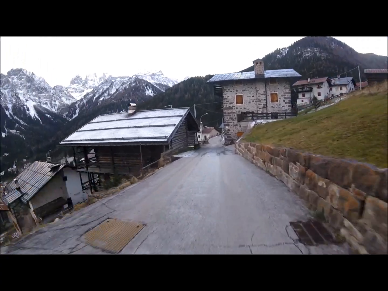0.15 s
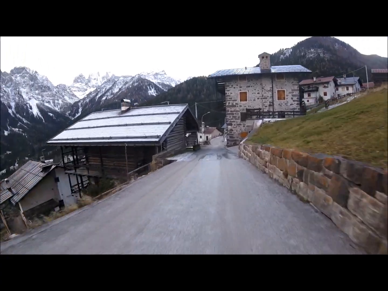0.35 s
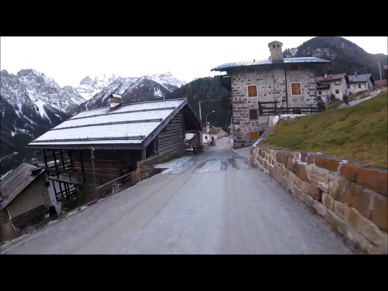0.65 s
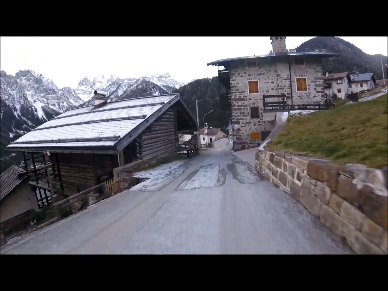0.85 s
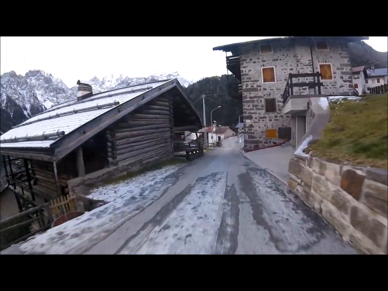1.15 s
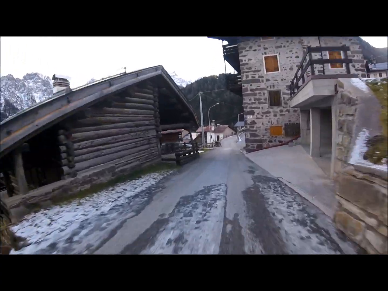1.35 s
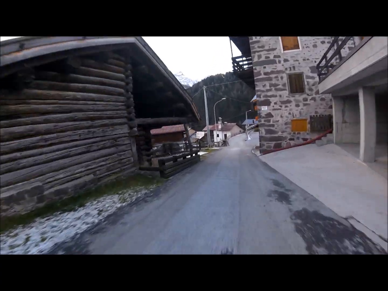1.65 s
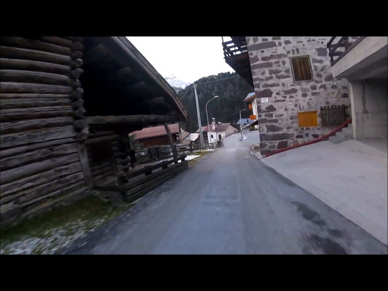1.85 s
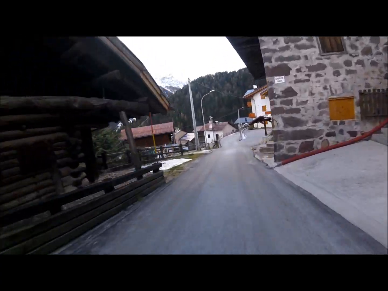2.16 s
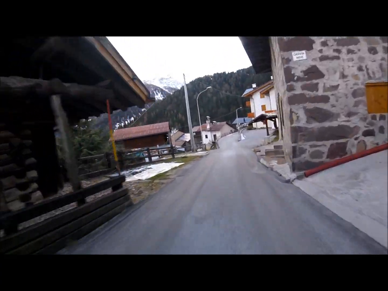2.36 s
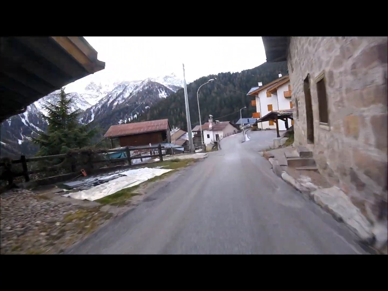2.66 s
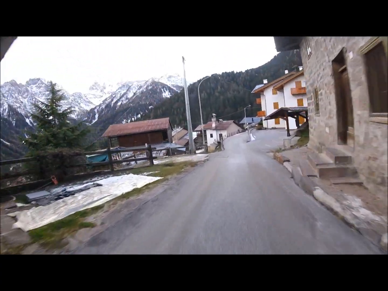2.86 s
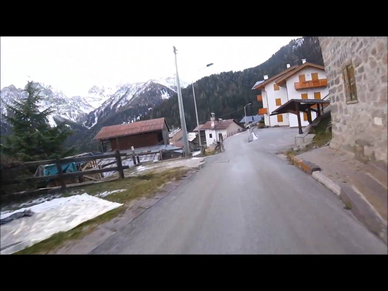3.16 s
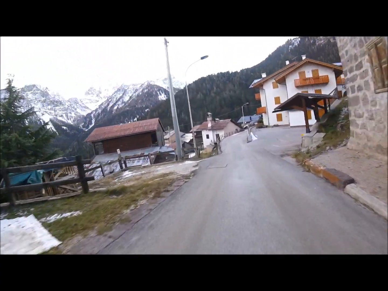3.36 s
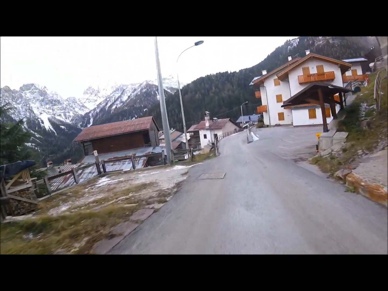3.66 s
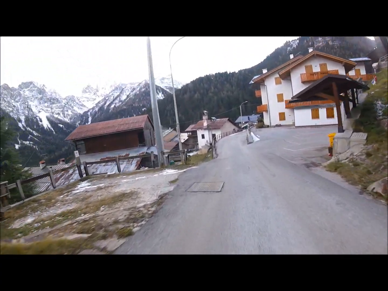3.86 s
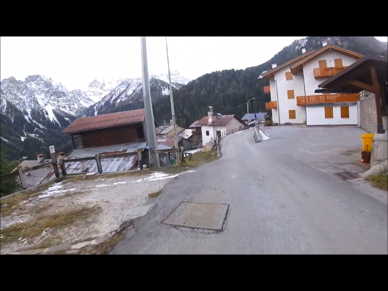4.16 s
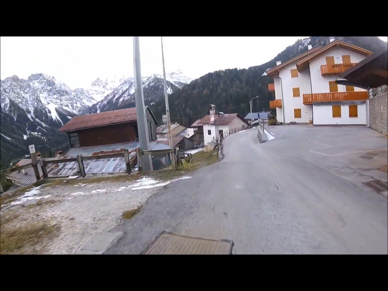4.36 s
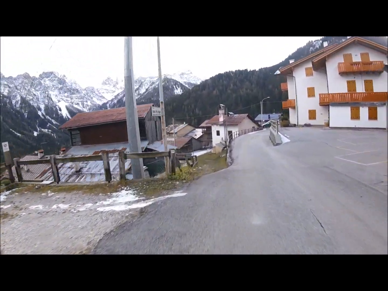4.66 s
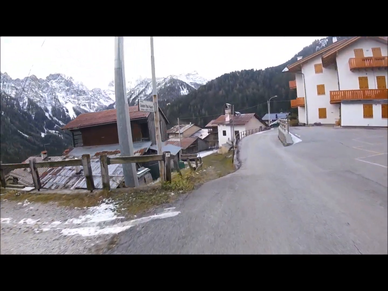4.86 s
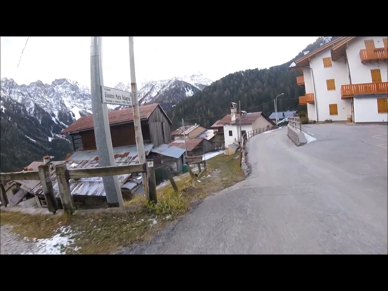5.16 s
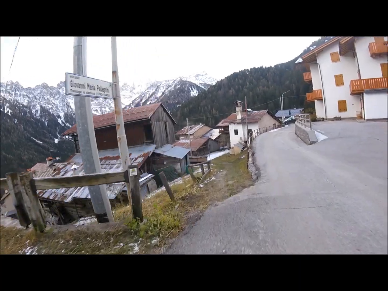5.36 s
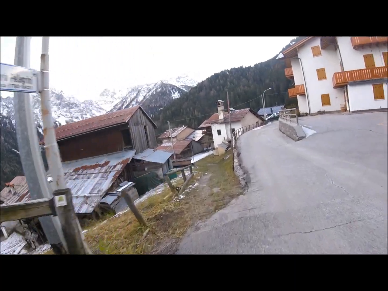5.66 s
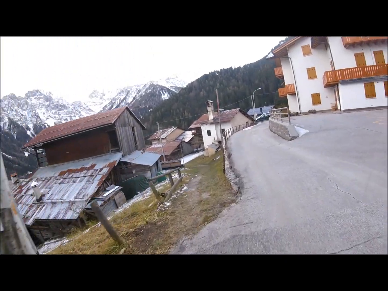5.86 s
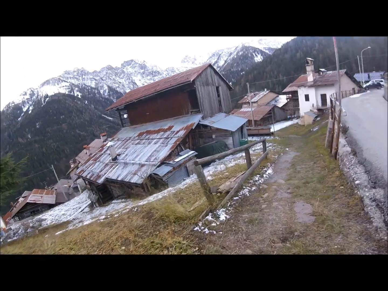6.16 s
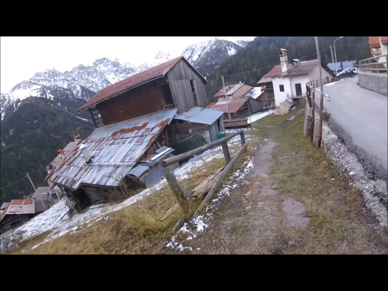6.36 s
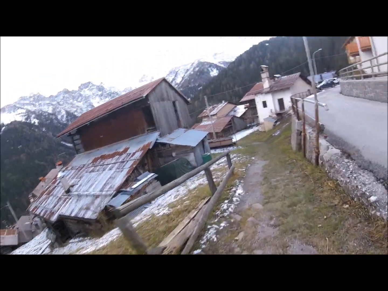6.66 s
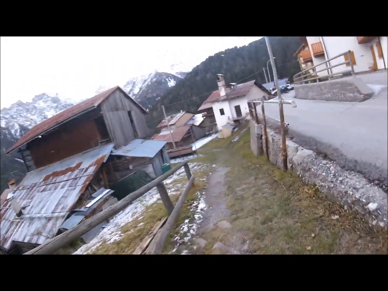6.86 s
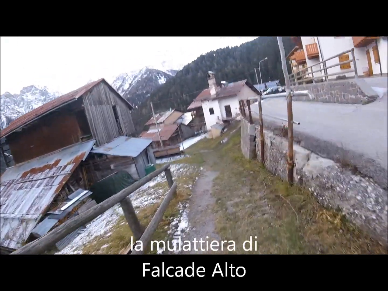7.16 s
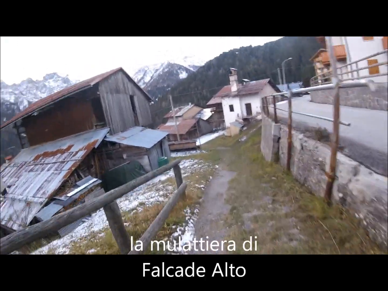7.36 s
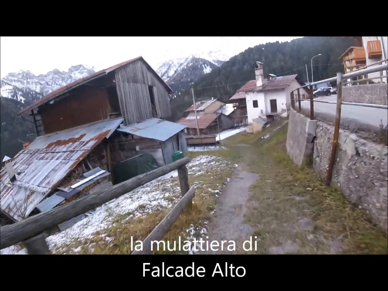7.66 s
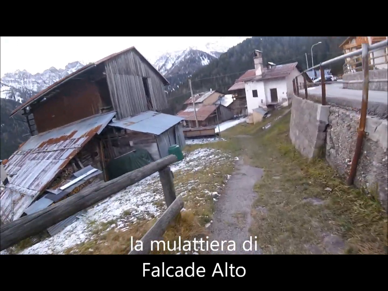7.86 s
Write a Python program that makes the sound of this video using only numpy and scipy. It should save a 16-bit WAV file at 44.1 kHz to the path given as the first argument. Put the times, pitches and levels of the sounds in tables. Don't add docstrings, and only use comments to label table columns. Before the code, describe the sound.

Outdoors, close on a moving bicycle: a buzzing tread drone with soft tyre hiss and frame rumble, wind pressing low on the microphone. Small dry ticks cluster early on and again midway. The drone sinks in pitch with slowing, thin brake squeaks and a faint disc whine appear, and rougher ground brings hollow thumps, quieter rolling and slight clicks at abrupt scene changes.

```python
import sys
import numpy as np
from scipy import signal
from scipy.fft import rfft, irfft
from scipy.io import wavfile
from scipy.ndimage import uniform_filter1d

SR = 44100
rng = np.random.default_rng(int(sys.argv[2]) if len(sys.argv) > 2 else 0)


def persist_wave(psi):
    counts = np.round(np.clip(psi, -1, 1) * 32767).astype(np.int16)
    wavfile.write(sys.argv[1], SR, np.atleast_2d(counts).T)


def how_loud(loudness_db):
    steps = np.asarray(loudness_db, float) / 20
    return 10 ** steps


N = 352800
T_S = np.arange(N) / SR

# t/s, block rate f/Hz, tyre load level/dB, side-block level/dB
WHEEL = [
    [(0.0, 288.4, 2.5, -9), (0.3, 285.3, -1, -12), (0.5, 297.2, 0, -5), (0.76, 280, -2.5, -10),
     (0.9, 287.8, -0.5, -7), (1.38, 282.3, -5, -2.5)],
    [(1.73, 289.4, -5, -28), (1.84, 290.8, 2, -1), (2.1, 281.5, -1.5, 2), (2.4, 271.4, -2.5, 3),
     (2.74, 250.9, -1, 0.5), (3.35, 220.3, 0.5, -2.5), (3.45, 217.5, 2, -13), (3.85, 197.3, 1, -12),
     (4.13, 177.5, -6, -5), (4.62, 156.8, 1, -12), (4.75, 148.7, -8.5, -2.5), (5.3, 108.4, -2, -5)],
]
TREAD_ORDERS = [0.72, 1, 1.44, 1.72, 2, 2.88, 3]
# level/dB (side row, centre row, side octave, sum tone, octave,
# fourth of side row, twelfth)
TREAD_LEVELS_DB = [-15, -16.5, -26.5, -22.5, -17.5, -30.5, -28.5]
# multiple of block rate [1], level/dB ahead of the frame modes
FAINT_ORDERS = [(0.89, -15.5), (1.2, -31.5), (2.44, -40.5)]
# f/Hz, half width/Hz, level/dB
HUM_MODES = [(153, 50, -8), (200.6, 15.4, -3), (227.5, 18, -12), (293, 12.8, -5), (320, 11.8, -1.5),
             (348.6, 11, 0), (363.8, 6.5, -6), (462, 19, -19), (548.3, 9.9, -4.5), (589, 6.6, -19),
             (710.8, 25, -1)]
# f/Hz, half width/Hz, level/dB
SIDEWALL_MODE = (416, 18, -8.5)
# f/Hz, width/Hz, level/dB
FRAME_MODES = [(196.5, 17, -7.5), (294.8, 37, -2.5), (334, 30, 2), (360.3, 21, -4), (447.5, 37, -17),
               (553, 86, -18), (698.4, 86, -8.5), (942, 69, -23)]
# t/s, rolling noise level/dB, ground roughness level/dB
RIDE = [(0.0, -38.5, -17.5), (0.7, -37.5, -23), (1.25, -38, -25.5), (1.6, -38, -22), (2.2, -38.5, -19.5),
        (3.1, -41, -22), (3.5, -40, -19), (4.0, -42, -17.5), (4.6, -44, -16.5), (5.0, -42.5, -18.5),
        (6.04, -45, -18), (6.12, -48, -23), (6.34, -45, -18), (6.44, -52.5, -25.5), (7.11, -47.5, -19.5),
        (7.42, -54.5, -26), (7.78, -51.5, -22), (8.0, -53, -28.5)]
# t/s, level/dB, half length/s
PATCHES = [
    (1.58, 0.5, 0.04),
    (3.18, 2, 0.062),
    (4.57, 5, 0.081),
    (5.17, 2.5, 0.083),
    (6.24, -0.5, 0.07),
    (6.84, 0.5, 0.087),
    (7.3, 7.5, 0.045),
    (7.55, -2.5, 0.082),
]
# f/Hz, level/dB per Hz
ROLL_SPECTRUM = [(240, -29), (400, 0.5), (534, -3.5), (712, -6.5), (834, -8.5), (959, -10.5), (1100, -16),
                 (1430, -15), (1870, -20.5), (2170, -24), (4300, -43), (5590, -68), (9460, -120)]
# f/Hz, level/dB per Hz
HISS_SPECTRUM = [(2350, -34), (4000, -20.5), (4220, -11.5), (5120, 3), (6050, -1.5), (6510, 4.5),
                 (7100, -5.5), (8120, -10.5), (8600, -14), (11200, -38), (18900, -120)]
# t/s, peak level/dB, f/Hz, t60/s
THUMPS = [(0.06, -8, 296, 0.071), (0.122, -8, 294, 0.11), (0.271, -6, 285, 0.11), (0.58, 0, 290.6, 0.25),
          (4.194, -7, 329, 0.15), (4.402, -12, 320.1, 0.12), (5.138, 3, 291.9, 0.25),
          (5.378, -5.5, 321.3, 0.21), (5.655, -5, 338, 0.097), (5.71, -3, 335, 0.24),
          (5.912, -6, 345.5, 0.14), (5.969, -22, 320, 0.16), (6.019, -13, 304, 0.34), (6.26, -9, 347, 0.29),
          (6.359, -4, 273, 0.13), (6.425, 7, 297, 0.1), (6.435, 2.5, 350, 0.15), (6.562, -9, 314, 0.13),
          (6.867, -8, 320, 0.13), (7.22, -2, 350, 0.17), (7.33, 4.5, 291, 0.077), (7.342, 2, 331, 0.12),
          (7.785, -36, 330, 0.089)]
# t/s, peak level/dB, f/Hz, length/s
TICKS = [(.5053, -31, 1410, 0.0018), (.7811, -35, 1100, 0.0023), (.9258, -36, 1100, 0.0018),
         (1.098, -41, 1510, 0.0018), (1.1677, -22.5, 1420, 0.0019), (1.3583, -32, 1530, 0.0018),
         (1.4077, -23, 1270, 0.0018), (1.4531, -26, 1300, 0.0018), (1.5174, -32, 1480, 0.0016),
         (1.537, -13.5, 1320, 0.0012), (1.5415, -18.5, 1500, 0.0028), (1.663, -23.5, 1473, 0.0025),
         (1.7994, -27, 1386, 0.0011), (2.0443, -38, 1330, .002), (2.6788, -28, 1450, .002),
         (2.8205, -36, 1410, 0.0019), (3.5054, -32, 1560, 0.0016), (3.8174, -26, 1490, 0.0025),
         (3.9188, -29, 2090, .0015), (3.9545, -25, 1460, 0.0031), (4.073, -31, 1517, 0.0022),
         (4.119, -27, 1514, 0.0027), (4.1934, -39, 1250, 0.0017), (4.2163, -26, 1270, 0.0015),
         (4.3284, -42, 1540, 0.0019), (4.3538, -35, 1900, .0015), (4.3754, -23, 1950, 0.0021),
         (4.393, -31, 1800, .003), (4.4177, -31, 1900, .0015), (4.4377, -30, 2000, .0015),
         (4.4433, -26, 1400, 0.003), (4.5205, -17.5, 1200, 0.0023), (4.5489, -37, 2000, .0015),
         (4.565, -20, 1295, 0.0022), (4.598, -23, 1430, 0.0014), (4.7586, -34, 1862, 0.0022),
         (5.1502, -21, 1270, 0.0023), (5.157, -31, 2300, 0.0034), (5.209, -26, 1700, 0.0018),
         (5.2584, -26, 1585, 0.0013), (5.2824, -31, 1560, 0.0017), (5.3226, -38, 1860, 0.0026),
         (5.4119, -33, 1840, 0.0022), (5.6045, -30, 1890, 0.002), (5.625, -30, 1700, .003),
         (5.6745, -35, 1200, 0.0019), (6.424, -28.5, 1760, 0.003), (6.9211, -36, 1250, .002),
         (6.977, -33, 1570, 0.0012), (7.071, -36, 1820, 0.002), (7.211, -32, 1520, 0.0048)]
# f/Hz, level/dB, t60/s
SHELL_MODES = [(760, 12, 0.025), (1400, 20, 0.026), (1560, 3.5, 0.013), (1840, 11.5, 0.03),
               (2300, -11, 0.044), (2780, -20, 0.029), (3500, -28.5, .012)]
# t/s, level/dB, f/Hz, width/Hz, length/s
SNAPS = [(1.537, -22.5, 1290, 150, .006), (5.8, -15.5, 350.4, 37, 0.14), (3.5, -17, 363, 13, 0.078),
         (.139, -29, 646, 300, .006), (3.363, -23, 693, 330, 0.0066), (3.908, -36, 716, 300, .005),
         (4.676, -31, 690, 430, .006), (4.72, -25.5, 692.6, 93, .25), (5.345, -30, 702.3, 280, 0.0056),
         (6.86, -31, 700, 460, .006), (7.044, -32, 700, 350, 0.0053), (7.581, -36, 700, 360, .006),
         (0.572, -37, 702, 400, .004), (1.45, -23.5, 436.6, 45, 0.17), (1.534, -12.5, 740, 960, 0.0038),
         (1.584, -19.5, 760, 780, 0.0032), (.82, -12.5, 203.5, 16, 0.076), (1.6, -16, 199.5, 25, 0.047),
         (2.256, -36, 690, 275, 0.004), (2.5, -32.5, 553, 8.8, 0.2), (2.28, -26, 553, 17, 0.074),
         (3.15, -27, 692, 30, 0.37), (3.1, -29.5, 553, 9, 0.1), (4.55, -21, 201, 14, .2),
         (4.84, -11.5, 192, 13, 0.039), (5.14, -20.5, 417.3, 37, .03), (5.145, -16, 710, 300, 0.015),
         (5.147, -28.5, 1880, 2200, 0.011), (5.1505, -32.5, 7000, 4100, 0.0035),
         (5.2, -18, 695, 270, 0.011), (5.4, -18, 186, 34, 0.099), (6.422, -24, 686, 600, 0.0049),
         (7.319, -40, 6570, 500, 0.0023), (7.326, -28.5, 1290, 930, 0.0046), (7.6, -50, 1800, 558, .012),
         (7.675, -38, 1019, 1100, 0.005), (7.745, -54, 8500, 2800, .003)]
# t/s, peak level/dB, length/s
JOLTS = [
    (6.11, -16, 0.025),
    (6.161, -32, 0.023),
    (6.186, -28, 0.021),
    (6.826, -7, 0.021),
    (7.253, -10, 0.037),
    (7.258, -26, 0.042),
    (7.588, -8.5, 0.025),
    (7.783, -10.5, 0.027),
]
# t/s of the top, peak level/dB, f/Hz, length/s
SQUEAKS = [(4.52, -64, 12250, 0.016), (4.885, -58, 12200, .014), (4.953, -35, 12370, .011),
           (5.008, -36, 12570, 0.0057), (5.09, -40, 12490, 0.016), (5.165, -71, 12400, .01),
           (5.245, -55, 12550, 0.016), (5.32, -53, 12500, 0.017), (5.48, -73, 12830, 0.013),
           (5.686, -55, 12500, 0.011), (6.057, -59, 12400, .006), (7.598, -37, 12370, 0.0066),
           (7.635, -66, 12600, .012), (7.682, -51, 12400, .012)]
# start t/s, length/s, level/dB, f/Hz
SQUEALS = [
    (5.555, .35, -52.5, 2468),
    (5.92, 0.19, -65, 2460),
    (6.94, 0.06, -58, 2456),
    (7.0, .07, -57, 2456),
    (7.095, .065, -54, 2456),
    (7.16, .13, -57, 2452),
    (7.07, .1, -62, 3085),
]
# f/Hz, level/dB per Hz
WIND_SPECTRUM = [(8.8, -33), (15, -1.5), (70, 6), (84, 7), (102, -12.5), (130, -19.5), (170, -46.5),
                 (290, -120)]
# t/s, level/dB, half length/s
GUSTS = [(0.0, 15, 0.0065), (.6, 2.5, 0.23), (.96, 6.5, 0.1), (1.2, 13, 0.045), (1.3, -2, 0.048),
         (1.45, 6.5, 0.095), (1.52, -13, 0.028), (2.2, -3.5, .04), (2.54, -6, 0.14), (2.75, 8, 0.046),
         (2.92, -8.5, 0.15), (3.09, 6.5, 0.046), (3.18, -14.5, 0.061), (3.5, -0.5, .12), (3.72, -4, 0.056),
         (4.12, 1.5, 0.13), (4.64, -3.5, 0.074), (5.15, 4.5, 0.16), (5.48, 3.5, 0.2), (5.88, -10, 0.024),
         (6.33, 5, 0.1), (6.64, -10.5, 0.091), (6.84, 3.5, 0.099), (7.08, -9, 0.071), (7.2, 6.5, 0.042),
         (7.3, -1, 0.033), (7.36, 10.5, 0.043), (7.5, -5.5, 0.13), (7.78, 0, 0.046)]
# t/s, dip level/dB, recovery/s, click level/dB, click top f/Hz
JOINS = [
    (6.0616, -22, .014, -22, 13500),
    (6.3679, -8, .05, -23, 7000),
    (7.2959, -8, .04, -19, 7000),
]


def tread():
    hz, load_db, side_db, _ = in_time(sum(WHEEL, []))
    gate = sum(in_time(rows)[-1] for rows in WHEEL)
    turn = 2 * np.pi * np.cumsum(hz) / SR
    hum = 0
    for k, db in zip(TREAD_ORDERS, TREAD_LEVELS_DB):
        modes = HUM_MODES + [SIDEWALL_MODE] * (k < 1.5)
        lit = sum(how_loud(top_db) / (1 + ((k * hz - f) / w) ** 2) for f, w, top_db in modes)
        level = how_loud(db + load_db + side_db * (k < 1) + 1.3 * drift(12))
        hum = hum + np.sqrt(2) * lit * level * np.sin(k * turn + .28 * k * drift(12))
    faint = 0
    for k, db in FAINT_ORDERS:
        faint = faint + how_loud(db + 2.2 * drift(8.6)) * np.sin(k * turn + 1.66 * drift(9.5))
    faint = gate * faint
    through_frame = 0
    for f, w, db in FRAME_MODES:
        through_frame = through_frame + how_loud(db / 2) * resonance(resonance(faint, f, 2 * w), f, w)
    return gate * hum + through_frame


def carcass_drone():
    tarmac_end_s, fall_db_per_s, path_db = (4.9, 6.7), 1.1, -13
    level_db = -24 - fall_db_per_s * np.minimum(T_S, tarmac_end_s[0])
    level_db = level_db + np.interp(T_S, tarmac_end_s, [0, path_db])
    return how_loud(level_db + 2.5 + 2.95 * drift(26)) * noise_band(98, 231, order=3)


def frame_rumble():
    grit = rng.standard_normal(N) * how_loud(1.0 * drift(8.1))
    rumble = 0
    for k, (hz, w, db) in enumerate(FRAME_MODES):
        ring = resonance(resonance(grit, hz, 3 * w), hz, w)
        rumble = rumble + (-1) ** k * how_loud(db) * ring / np.sqrt(w)
    return rms_one(rumble)


def rolling(roll_db):
    path_grit_db = 5 * (T_S > JOINS[1][0])
    scrub = how_loud(roll_db + 7.0) * coloured(ROLL_SPECTRUM, shared_db=1.0, own_db=1.67, rate_hz=52)
    stirred = resonance(resonance(rng.standard_normal(N), 1870, 200), 1870, 110)
    return scrub + how_loud(roll_db - 13 + path_grit_db) * rattle() + how_loud(roll_db - 15.0) * rms_one(stirred)


def rattle():
    clicks_per_s = 90
    clicks = (rng.random(N) < clicks_per_s / SR) * how_loud(1.1 * np.minimum(rng.exponential(1, N), 3)) + 1e-18
    ring = sum(how_loud(db) * resonance(clicks, hz, 300) for hz, db, t60 in SHELL_MODES)
    return rms_one(band(ring, 500, 4100, order=3))


def air_hiss(roll_db):
    hiss_db = -49 + 0.69 * (roll_db + 40)
    hiss = how_loud(hiss_db) * coloured(HISS_SPECTRUM, shared_db=0.46, own_db=1.24, rate_hz=51)
    dull_edge = how_loud(hiss_db - 8.5) * noise_band(2300, 3800, order=3)
    frost = (T_S > WHEEL[0][-1][0]) & (T_S < WHEEL[1][0][0])
    fall_db_per_s, frost_db, bright_db = 2.5, -6, 5.5
    top_db = -59 - fall_db_per_s * T_S + frost_db * frost + bright_db * bright_shot()
    return hiss + dull_edge + how_loud(top_db + 1.0 * drift(10)) * noise_band(8300, 9820, order=6)


def knocks():
    blows = struck(THUMPS, thump) + struck(TICKS, tick) + struck(SNAPS, snap) + struck(JOLTS, jolt)
    return signal.sosfilt(signal.butter(8, 9800, fs=SR, output="sos"), blows + 1e-18)


def thump(peak_db, hz, t60_s):
    t = np.arange(round(.2 * SR)) / SR
    body = np.sin(2 * np.pi * hz * t)
    body = body + 0.2 * np.sin(2 * np.pi * 1.3 * hz * t) + 0.26 * np.sin(2 * np.pi * 0.78 * hz * t)
    body = body + 0.04 * np.sin(2 * np.pi * 700 * t)
    decay = how_loud(-60 * t / np.clip(t60_s, .02, 1))
    onset = 1 - np.exp(-(t / 0.00092) ** 2)
    return how_loud(peak_db - 7.5) * body * decay * onset


def tick(peak_db, hz, length_s):
    crack, tail, size = 1.1, .07, 1600
    contact = np.exp(-((np.arange(size) / SR - .8 * length_s) * hz * 9) ** 2)
    clatter = contact + tail * burst(2 * length_s, size)
    ring = 0
    for f, db, t60_s in SHELL_MODES:
        ring = ring + how_loud(db - 8 * abs(np.log2(f / hz))) * resonance(clatter, f, 8.0 / t60_s)
    ring = band(ring + crack * resonance(clatter, 1.4 * hz, 1500), 500, 3300, order=4)
    return how_loud(peak_db + 2) * ring / abs(ring).max()


def snap(level_db, hz, width_hz, length_s):
    shake = burst(length_s / 2, size=round(4 * length_s * SR) + 1500)
    shake = band(shake, hz - width_hz / 2, hz + width_hz / 2, order=3)
    return how_loud(level_db + 1.5) * shake / abs(shake).max()


def jolt(peak_db, length_s):
    t = np.arange(round(.12 * SR)) / SR / length_s
    push = np.exp(-((t - .5) / 0.19) ** 2) - 0.6 * np.exp(-((t - 1.3) / 0.3) ** 2)
    fade = np.hanning(2 * len(t))[:len(t)][::-1]
    return how_loud(peak_db - 1) * push * fade * np.minimum(t / 0.37, 1)


def brake():
    sag_hz_per_s, edge_s = 10, 0.015
    out = np.roll(struck(SQUEAKS, squeak), -round(.05 * SR))
    for s, length_s, db, hz in SQUEALS:
        gate = np.clip(np.minimum(T_S - s, s + length_s - T_S) / edge_s, 0, 1)
        level = np.sqrt(2) * how_loud(db - 4 + 2.0 * drift(18))
        pitch_hz = hz - sag_hz_per_s * (T_S - s) + 5 * drift(20)
        out = out + gate * level * np.sin(2 * np.pi * np.cumsum(pitch_hz) / SR)
    return out


def squeak(peak_db, hz, length_s):
    t = (np.arange(round(.16 * SR)) / SR - .05) / length_s
    swell = np.exp(-t ** 2) + .08 * np.exp(-(t / 3) ** 2)
    slip = rng.standard_normal(len(t)) * swell * np.hanning(len(t))
    ring = resonance(resonance(resonance(slip, hz, 700), hz, 500), hz, 350)
    ring = ring + .1 * resonance(resonance(slip, .96 * hz, 300), .96 * hz, 300)
    ring = band(ring, .93 * hz, 1.05 * hz, order=3)
    return how_loud(peak_db) * ring / abs(ring).max()


def wind():
    rumble = coloured(WIND_SPECTRUM, shared_db=1.5, own_db=0.0, rate_hz=14)
    return how_loud(-22.5 + swells(GUSTS)) * rumble


def amplifier_floor():
    creep_db = 1.24 * T_S + 5.5 * bright_shot()
    floor = how_loud(-116 + 25.5 * (T_S > 1.37) + creep_db) * noise_band(10000, 11800, order=6)
    opening = np.clip(T_S - 5.5 + 1, .1, 1)
    crest = how_loud(-3.5 + 4 * drift(3)) * opening * noise_band(12800, 13700, order=8)
    return floor + how_loud(-89.5 + creep_db) * (noise_band(11700, 12800, order=8) + crest)


def bright_shot():
    return (T_S > JOINS[0][0]) & (T_S < JOINS[1][0])


def rms_one(x):
    return x / np.sqrt(np.mean(x ** 2) + 1e-20)


def in_time(rows):
    s, *columns = np.transpose(rows)
    since_start = T_S - s[0] + .01 * (s[0] == 0)
    gate = np.clip(np.minimum(since_start, s[-1] - T_S) / .01, 0, 1)
    return [np.interp(T_S, s, c) for c in columns] + [gate]


def swells(events):
    return sum(db * np.exp(-((T_S - s) / half_s) ** 2) for s, db, half_s in events)


def drift(rate_hz):
    r = np.exp(-80 * np.pi * rate_hz / SR)
    slow = signal.lfilter([1], [1, -2 * r, r * r], rng.standard_normal(N // 40 + 2002))[2000:]
    return np.interp(np.arange(N) / 40, np.arange(len(slow)), rms_one(slow))


def resonance(x, hz, width_hz):
    r = np.exp(-np.pi * width_hz / SR)
    poles = [1, -2 * r * np.cos(2 * np.pi * hz / SR), r * r]
    return signal.lfilter([(1 - r * r) / 2, 0, (r * r - 1) / 2], poles, x)


def band(x, low_hz, high_hz, order):
    return signal.sosfilt(signal.butter(order, [low_hz, high_hz], "band", fs=SR, output="sos"), x)


def noise_band(low_hz, high_hz, order):
    return rms_one(band(rng.standard_normal(N), low_hz, high_hz, order))


def burst(length_s, size):
    t = np.arange(size) / SR / max(length_s, 1e-4)
    return rng.standard_normal(size) * t * np.exp(1 - t)


def coloured(spectrum, shared_db, own_db, rate_hz):
    hz, db = np.transpose(spectrum)
    bins_hz = np.maximum(np.arange(N // 2 + 1) * SR / N, 1)
    bins_db = np.interp(np.log(bins_hz), np.log(hz), db, left=-120, right=-120)
    shaped = rfft(rng.standard_normal(N)) * how_loud(bins_db)
    place = 3 * np.log2(bins_hz)
    shared, out = drift(rate_hz), 0
    for k in np.arange(np.floor(3 * np.log2(hz[0])), 3 * np.log2(hz[-1]) + 3, 3):
        octave = irfft(shaped * np.clip(1 - abs(place - k) / 3, 0, 1), N)
        out = out + octave * how_loud(shared_db * shared + own_db * drift(rate_hz))
    return rms_one(out)


def struck(events, sound):
    out = np.zeros(N + SR)
    for s, *settings in events:
        piece, start = sound(*settings), round(s * SR)
        out[start:start + len(piece)] += piece
    return out[:N]


def scene():
    roll_db, frame_db, _ = in_time(RIDE)
    roll_db = roll_db + swells(PATCHES)
    tyres = tread() + carcass_drone() + rolling(roll_db) + air_hiss(roll_db)
    frame = how_loud(frame_db - 2.5) * frame_rumble() + knocks()
    return (tyres + frame + brake() + wind() + amplifier_floor())[None]


def starved(x, edge_hz, reach_db):
    hz, _, cells = signal.stft(x, SR, nperseg=1024)
    groups = np.arange(len(hz)) // 8
    power = np.add.reduceat(abs(cells) ** 2, np.arange(0, len(hz), 8))
    level_db = 10 * np.log10(power + 1e-20)
    budget_db = uniform_filter1d(level_db.max(axis=0), size=31) - reach_db
    chance_db = uniform_filter1d(rng.normal(0, 14, level_db.shape), size=5)
    lucky = (level_db + chance_db > budget_db) & (chance_db > -5.5)
    strong = level_db > budget_db + 22
    kept = (lucky | strong)[groups] | (hz < edge_hz)[:, None]
    return signal.istft(cells * kept, SR, nperseg=1024)[1][:N]


def low_pass(x):
    return signal.sosfilt(signal.butter(12, 13880, fs=SR, output="sos"), x)


def record(dry):
    wet = 1.4 * np.tanh(dry / 1.4)
    for s, depth_db, recovery_s, _, _ in JOINS:
        fall = np.clip((T_S - s) / .001, 0, 1)
        wet = wet * how_loud(depth_db * fall * np.exp(-np.clip((T_S - s) / recovery_s, 0, 50)))
    wet = starved(wet[0], edge_hz=8300, reach_db=77.0)[None]
    for s, _, _, click_db, top_hz in JOINS:
        click = how_loud(click_db) * (np.arange(N) == round(s * SR))
        wet = wet + signal.lfilter(*signal.butter(3, top_hz, fs=SR), click)
    return low_pass(wet)


dry = scene()
out = record(dry)
persist_wave(out)
```